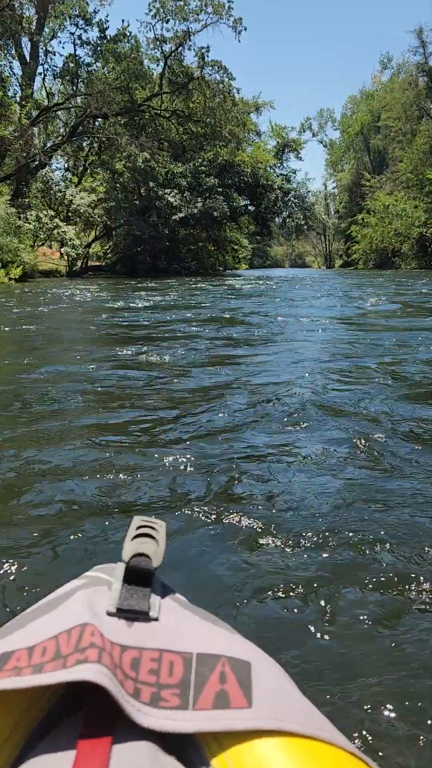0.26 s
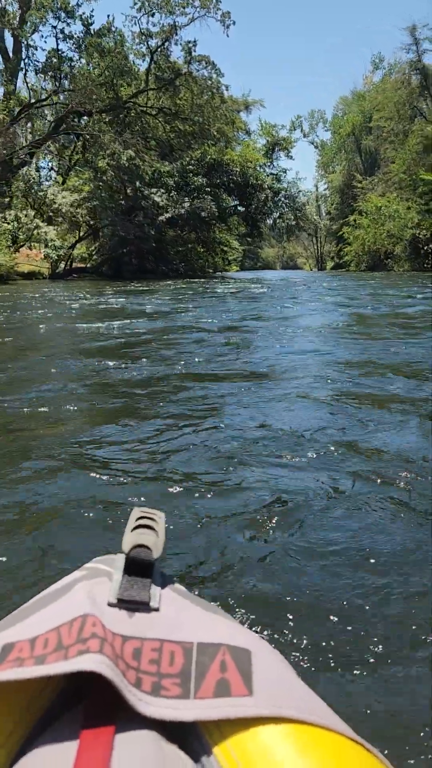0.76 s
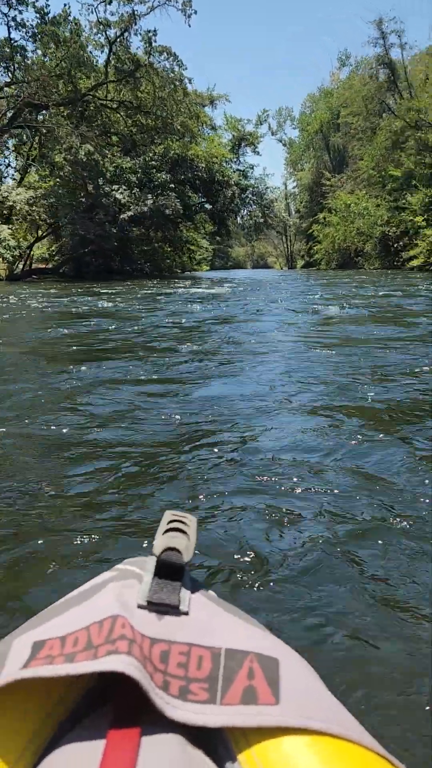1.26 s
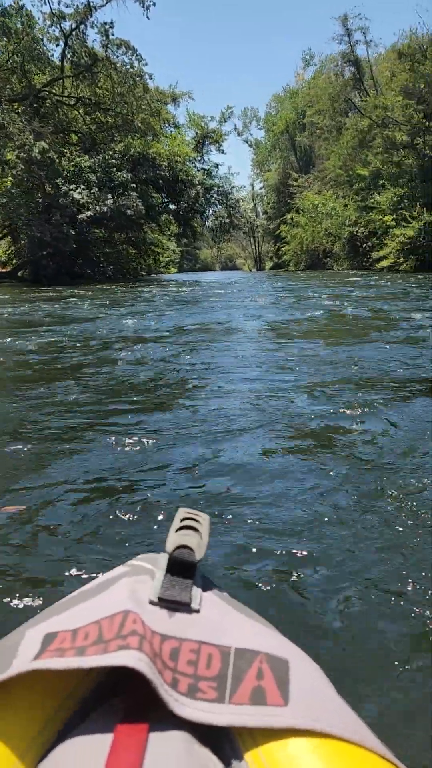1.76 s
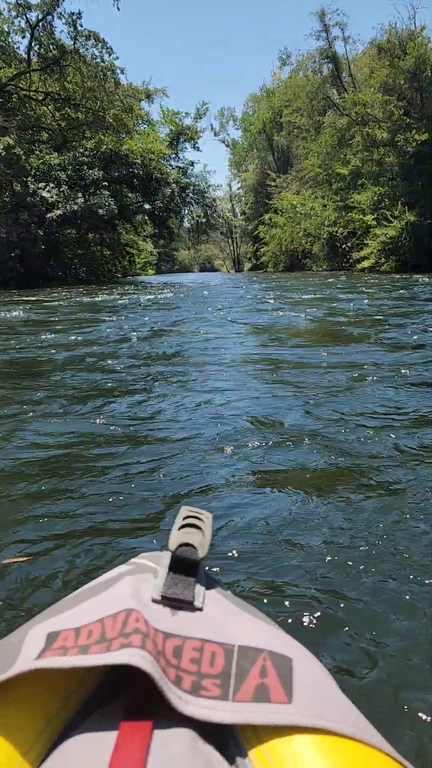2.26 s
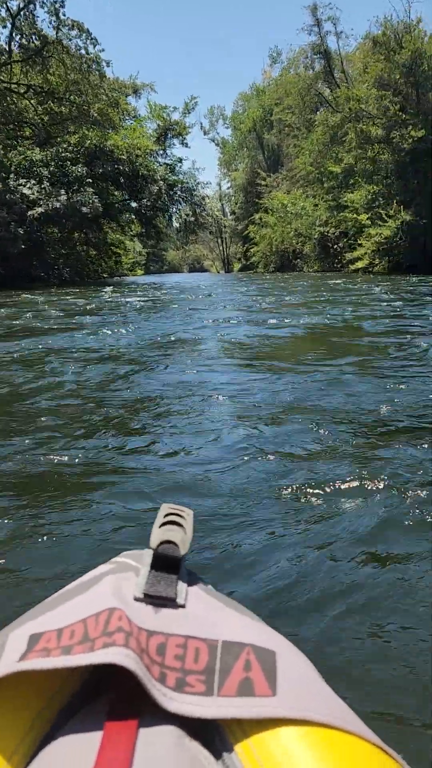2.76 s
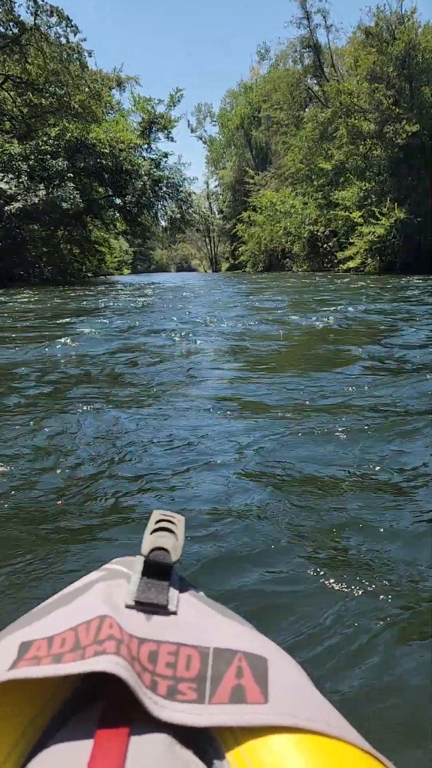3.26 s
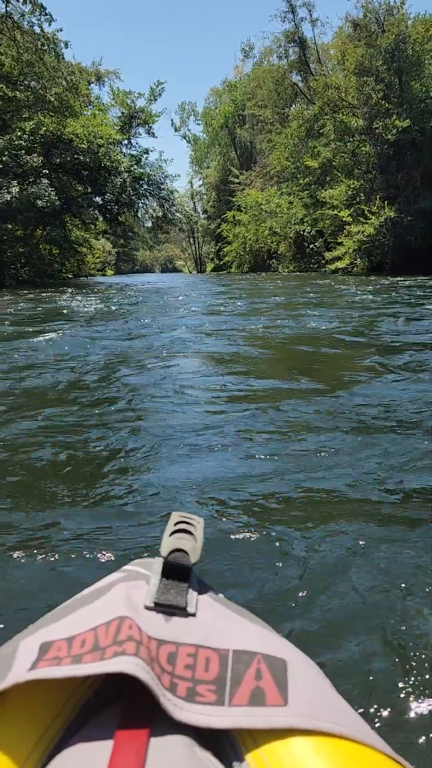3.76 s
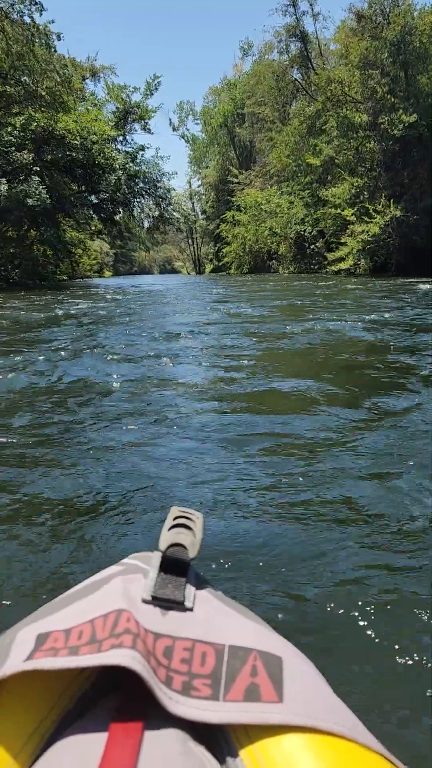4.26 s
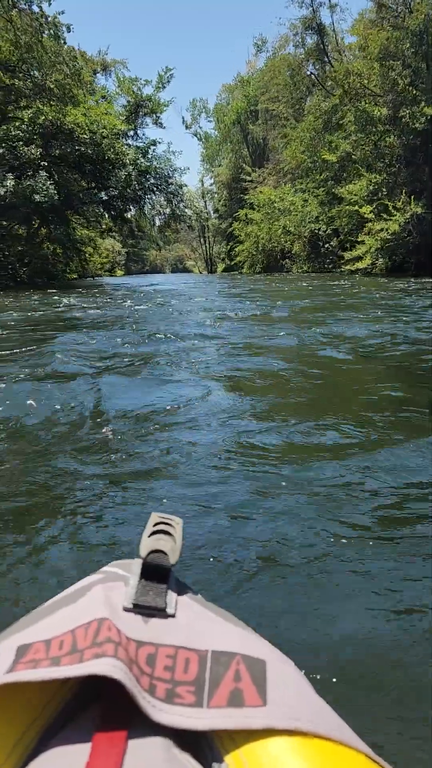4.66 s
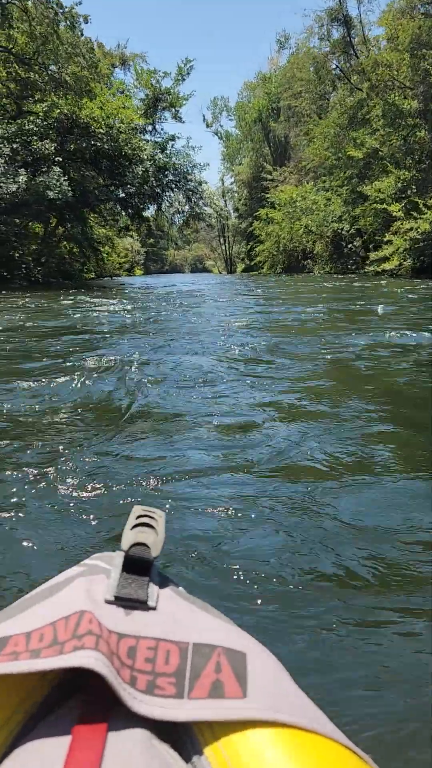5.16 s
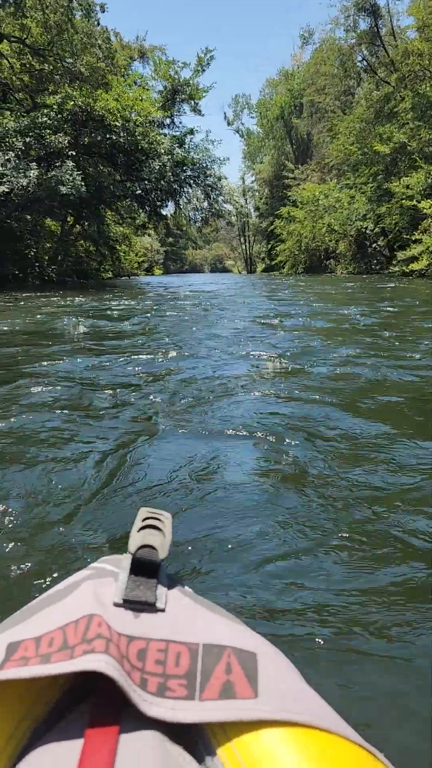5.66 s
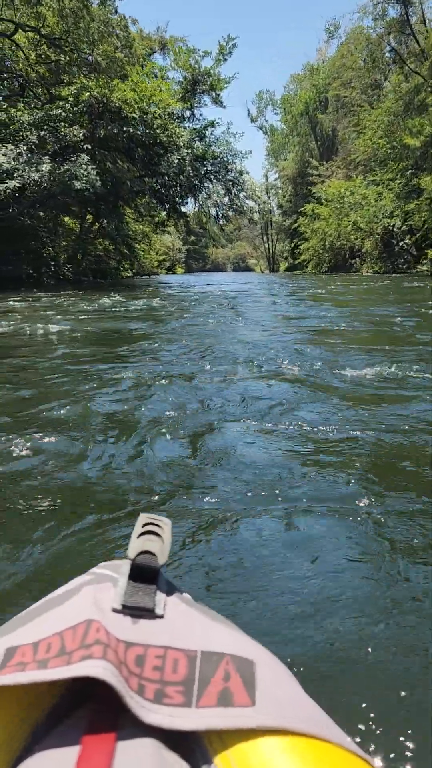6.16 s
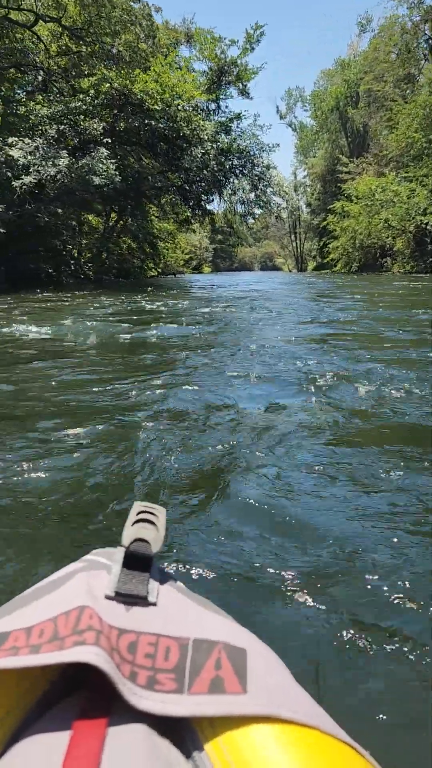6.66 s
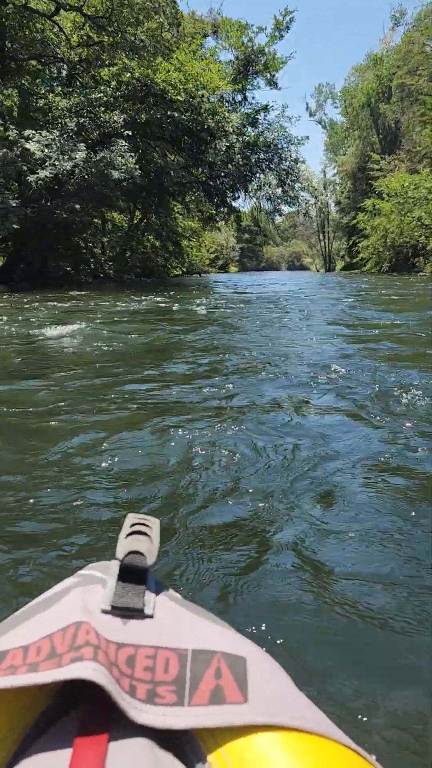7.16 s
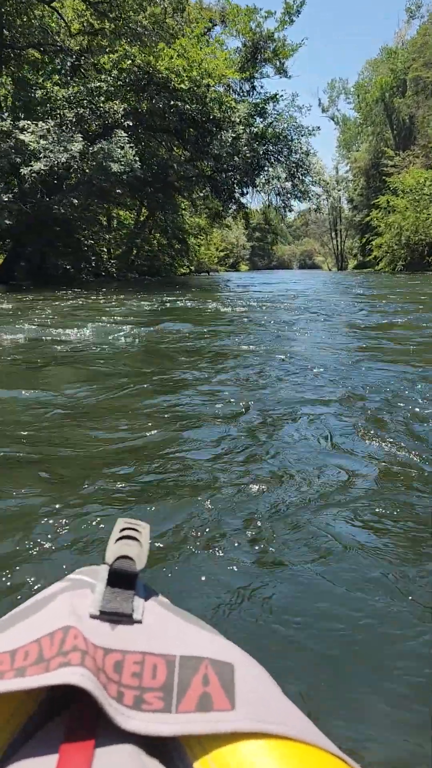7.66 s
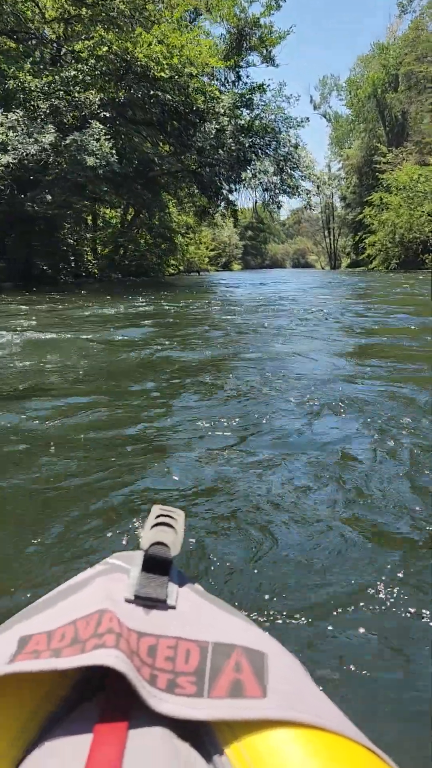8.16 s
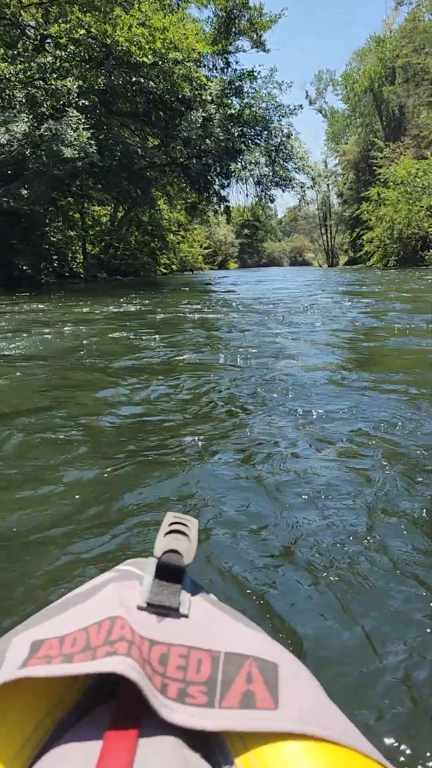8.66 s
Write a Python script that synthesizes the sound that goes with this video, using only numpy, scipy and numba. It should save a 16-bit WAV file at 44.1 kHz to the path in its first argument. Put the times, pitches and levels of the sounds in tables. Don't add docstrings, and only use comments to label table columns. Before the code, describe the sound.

A fast river hisses steadily around an inflatable boat while wavelets slap its air-filled tubes with dull booms, bubbles pop and drops patter on deck.

```python
import sys
import numpy as np
from scipy import signal
from scipy.fft import rfft, irfft, next_fast_len
from scipy.io import wavfile
from scipy.ndimage import uniform_filter1d
from numba import njit

SR = 44100
rng = np.random.default_rng(int(sys.argv[2]) if len(sys.argv) > 2 else 0)


def voltage_ratio(level):
    return 10 ** (np.asarray(level, float) / 20)


def master(y):
    cut = np.clip(np.atleast_2d(y).T, -1, 1)
    pcm = np.round(cut * 32767)
    wavfile.write(sys.argv[1], SR, pcm.astype(np.int16))


N = 393354
T = np.arange(N) / SR

# (onset [s], level [dB], treble re that level [dB])
BREAKS = [(.738, -20, -25), (1.361, -16, -21), (1.393, -13.5, -21), (1.444, -19.5, -38), (1.866, -19, -18),
          (2.011, -18, -22), (2.172, -27, -14), (2.43, -21, -22), (2.745, -19, -22), (3.763, -19, -28),
          (4.38, -17.5, -18.5), (4.435, -20, -32), (4.728, -18, -36), (4.79, -15.5, -16),
          (5.231, -19, -15.5), (4.616, -15, -15), (5.57, -17.5, -21), (6.345, -15.5, -27),
          (6.954, -20, -14), (6.986, -16, -23), (7.043, -13.5, -22), (7.294, -17, -35), (7.346, -19, -37),
          (6.412, -19, -24), (7.632, -13.5, -24), (7.663, -10.5, -28), (7.898, -19, -14.5),
          (8.187, -21, -20.5), (8.234, -20, -24.5), (8.512, -20, -30), (.938, -21, -28), (1.948, -16, -22),
          (2.345, -22, -26), (2.476, -19, -24), (5.405, -19, -20), (5.474, -22, -20), (6.427, -18, -24)]
BREAK_S = .004


def unit(x):
    return x / np.sqrt(np.mean(x ** 2))


def low(x, hz, order):
    return signal.sosfilt(signal.butter(order, hz, fs=SR, output="sos"), x)


@njit
def svf(x, hz, width):
    y, band, deep = np.empty(len(x)), 0., 0.
    g, k = np.tan(np.pi * hz / SR), width / hz
    for i in range(len(x)):
        v = (band + g * (x[i] - deep)) / (1 + g * (g + k))
        band = 2 * v - band
        deep += 2 * g * v
        y[i] = k * v
    return y


@njit
def rings(s, size, hz, tau, rise, turn, round_=1.):
    y = np.zeros(N)
    for k in range(len(s)):
        start, phase = int((s[k] - tau[k]) * SR), turn[k]
        for i in range(max(-start, 0), min(int(8 * tau[k] * SR), N - start)):
            u = i / (tau[k] * SR)
            pitch = min(hz[k] * (1 + rise[k] * (u - 1)), .45 * SR)
            phase += 2 * np.pi * pitch / SR
            y[start + i] += size[k] * (u * np.exp(1 - u)) ** round_ * np.sin(phase)
    return y


def swell(s, db, tau):
    return rings(s, voltage_ratio(db), 0 * s, tau + 0 * s, 0 * s, 0 * s + np.pi / 2)


def walk(rate):
    hold = int(SR / rate)
    steps = np.repeat(rng.standard_normal(N // hold + 1), hold)
    slewed = uniform_filter1d(uniform_filter1d(steps, hold), hold)
    return unit(slewed[:N])


def curves(table):
    s, *columns = np.transpose(table)
    return [np.interp(T, s, c) for c in columns]


def port_db(hz):
    # (frequency [Hz], level per Hz [dB])
    left_port = [(30, -44), (70, -49), (140, -54.5), (250, -72.5), (420, -72.5), (560, -65.5),
                 (1200, -68.5), (1550, -67.5), (2050, -65), (2900, -79), (4700, -78.5), (5300, -87.5),
                 (7600, -86.5), (9300, -101)]
    # (frequency [Hz], level per Hz [dB])
    right_port = [(30, -53), (70, -46), (140, -58), (230, -86), (390, -61.5), (470, -75), (800, -67),
                  (1300, -69.5), (1550, -64.5), (1950, -78.5), (2900, -89), (4600, -92.5), (5300, -93),
                  (8400, -103)]
    # (frequency [Hz], left level per Hz [dB], right level per Hz [dB])
    top_octave = [(9350, -101, -120), (10800, -96.5, -113), (11150, -120, -134), (11600, -120, -132),
                  (11900, -104, -120), (13700, -101, -119), (15000, -105, -124), (15700, -113, -130)]
    top = np.array(top_octave)
    left = np.vstack([left_port, top[:, [0, 1]]])
    right = np.vstack([right_port, top[:, [0, 2]]])
    return np.array([np.interp(np.log(hz), np.log(t[:, 0]), t[:, 1]) for t in (left, right)])


def ports(x):
    n = next_fast_len(N)
    hz = np.arange(n // 2 + 1) * SR / n + 1
    cavity_db = 3.9 / (1 + ((hz - 1555) / 70) ** 2) + 2.2 / (1 + ((hz - 2600) / 150) ** 2)
    return irfft(rfft(x, n) * voltage_ratio(port_db(hz) + cavity_db + 65.5), n)[:, :N]


def pair(hz, width):
    # (frequency [Hz], left-right correlation [-1 to 1])
    likeness = [(60, 0.85), (300, 0.77), (700, 0.75), (1500, 0.57), (3500, 0.18)]
    known_hz, alike = np.transpose(likeness)
    c = np.clip(np.interp(np.log(hz), np.log(known_hz), alike), 0, 1)
    mid, side = (svf(rng.standard_normal(N), hz, width) for _ in range(2))
    return np.sqrt(1 + c) * mid + np.sqrt(1 - c) * side * np.array([[1], [-1]])


def shower(count, lo_hz, hi_hz, cycles, rise, spread_db):
    when, pitch, loud, place = rng.random((count, 4)).T
    hz = lo_hz * (hi_hz / lo_hz) ** pitch
    size = voltage_ratio(-spread_db * np.log(1 - .98 * loud)) * hz / lo_hz
    sides = np.cos(place * np.pi / 2), np.sin(place * np.pi / 2)
    return unit(np.array([rings(when * N / SR, size * g, hz, cycles / hz, rise + 0 * hz, 0 * hz)
                          for g in sides]))


def heard(s, db, hz, tau, rise, left_share):
    left, right = port_db(hz)
    pans = (left_share * (left - right), (left_share - 1) * (left - right))
    return np.array([rings(s, voltage_ratio(db + pan), hz, tau, rise, 0 * s) for pan in pans])


def river(rush_db):
    hiss, surge = 0, walk(4.0)
    for hz in 216.0 * 2 ** np.arange(0, 6.4, .5):
        flicker_db = 0.32 * surge + 2.1 * walk(13)
        hiss = hiss + voltage_ratio(flicker_db) * pair(hz, hz / 2.1)
    fizz = shower(count=5000, lo_hz=400., hi_hz=14070.0, cycles=2.593, rise=0.017, spread_db=4.6)
    gurgle = shower(count=900, lo_hz=449.0, hi_hz=3520.0, cycles=2.527, rise=0.049, spread_db=2.5)
    return voltage_ratio(rush_db + 9.0) * ports(unit(hiss) + voltage_ratio(-7.5) * fizz + voltage_ratio(-11.5) * gurgle)


def heave(heave_db, lap_db):
    heave_gain = voltage_ratio(heave_db - 3.0 + 2.4 * np.clip(walk(12), -2, 1.2))
    lap_gain = voltage_ratio(lap_db - 3.0 + 3.6 * np.clip(walk(22), -2, 1.1))
    flex = unit(pair(56.0, 12.0) + voltage_ratio(-8.5) * pair(23.0, 22.0))
    lapping = unit(pair(85., 30.0) + voltage_ratio(2.5) * low(pair(140.6, 32.0), 175., order=2))
    return heave_gain * flex + lap_gain * lapping


def booms():
    # (peak [s], boom [dB], boom pitch [Hz], length [s], thump re boom [dB])
    slaps = [(1.316, -15.5, 106, .014, -18), (1.401, -12, 141, 0.015, -8.5), (1.435, -14, 125, 0.024, -10),
             (1.763, -19.5, 123, 0.019, -14), (1.884, -13.5, 96, 0.029, -11), (1.965, -2, 115, 0.013, -16),
             (2.496, -15, 150, 0.018, -8), (3.779, -15, 147, 0.024, -19), (4.428, -21, 160, 0.024, 4.5),
             (4.46, -14, 138, 0.017, -23), (4.641, -16.5, 147, 0.02, -13), (4.806, -10.5, 129, 0.029, -19),
             (5.256, -18, 135, 0.014, -21), (5.426, -14, 149, 0.02, -17), (5.591, -17, 165, 0.015, -4),
             (6.387, -16, 117, 0.014, -11), (6.434, -12.5, 140, 0.013, -9), (6.962, -11, 126, 0.031, -11.5),
             (6.994, -10, 133, .02, -12), (7.017, -8.5, 114, .017, -22), (7.061, -4.5, 144, 0.019, -25),
             (7.683, -11, 131, .014, -13.5), (8.765, -13, 127, 0.012, -19), (8.798, -12, 138, 0.02, -29)]
    # (peak [s], boom [dB], boom pitch [Hz])
    taps = [(.752, -25, 107), (.782, -25.5, 137), (1.251, -26, 138), (2.033, -19.5, 145), (2.196, -23, 159),
            (2.372, -19, 114), (2.909, -28, 96), (3.207, -27.5, 114), (3.291, -27, 129), (3.75, -25, 120),
            (3.894, -24.5, 148), (4.091, -25.5, 127), (4.277, -27, 83), (4.385, -18, 161),
            (4.689, -22, 130), (4.748, -20, 135), (4.856, -26, 108), (5.089, -22.5, 104), (5.23, -25, 162),
            (5.318, -32, 87.5), (5.502, -19, 112), (5.826, -29, 102), (6.074, -27, 82),
            (7.343, -27.5, 90.5), (7.629, -27, 97), (7.74, -18.5, 130), (8.169, -22, 154),
            (8.525, -22, 102), (8.832, -23, 130), (.024, -27, 122), (.25, -30, 115), (.47, -30, 148),
            (.89, -28, 120), (1.276, -27, 125), (1.387, -18, 138), (1.467, -20, 130), (1.79, -23, 114),
            (1.953, -12, 111), (1.992, -14, 93), (2.402, -26, 126), (2.521, -18, 137), (3.165, -30, 138),
            (3.37, -31, 120), (4.228, -27, 127), (4.706, -24, 122), (4.782, -22, 119), (4.833, -20, 105),
            (5.056, -29, 113), (5.3, -28, 125), (5.481, -23, 150), (5.527, -23, 121), (5.627, -28, 125),
            (6.348, -25, 135), (6.45, -16, 127), (6.468, -18, 117), (6.689, -28, 120), (6.714, -30, 113),
            (6.76, -31, 100), (7.044, -15, 130), (7.758, -22, 137)]
    tap_cycles, tap_thump_db = 2.3, -13
    full_taps = [(s, db, hz, tap_cycles / hz, tap_thump_db) for s, db, hz in taps]
    s, db, hz, length, thump_db = np.transpose(slaps + full_taps)
    steady_s, sag_per_s = 0.018, 13.2
    rise = -sag_per_s * np.maximum(length - steady_s, 0)
    turn, place = rng.random((len(s), 2)).T
    pan_db = 0.075 * (hz - 90) + 3.9 * (place - .5)
    sides = voltage_ratio(np.array([pan_db, -pan_db]) / 2)
    boom = [rings(s, voltage_ratio(db) * g, hz, 0.6 * length, rise, 2 * np.pi * turn + lag * place, 2.)
            for g, lag in zip(sides, (0., 1.6))]
    thump = unit(pair(343.0, 100.0) + voltage_ratio(1.5) * pair(168.0, 60.)) * voltage_ratio(np.array([[-2.5], [1.5]]))
    return np.array(boom) + voltage_ratio(-5.0) * swell(s - .008, db + thump_db, 0.6 * length) * thump


def rocking():
    # (peak [s], level [dB], pitch [Hz])
    rocks = [(1.344, -27, 65), (1.408, -23, 57), (1.446, -16, 54), (1.901, -17, 65), (1.98, -13, 68),
             (2.02, -24, 63), (2.531, -29, 61), (3.2, -32, 60), (3.795, -29, 63), (4.07, -29, 50),
             (4.283, -31, 58), (4.44, -24, 59), (4.482, -22, 61), (4.521, -27, 55), (4.751, -28, 54),
             (4.831, -19, 58), (5.266, -23, 61), (5.333, -28, 58), (5.453, -28, 62), (6.393, -26, 63),
             (6.455, -20, 65), (6.983, -23, 53), (7.022, -18, 66), (7.077, -19, 64), (7.109, -25, 76),
             (7.666, -26, 63), (7.709, -26, 63), (8.819, -27, 67), (8.853, -27, 61)]
    s, db, hz = np.transpose(rocks)
    return rings(s, voltage_ratio(db), hz, .85 / hz, 0 * s, 2 * np.pi * rng.random(len(s)), 1.5)


def hull(heave_db, lap_db):
    return low(heave(heave_db, lap_db) + booms() + rocking(), 665.0, order=4)


def froth():
    s, db = np.repeat(BREAKS, 4, axis=0).T[:2]
    late, pitch, loud = rng.random((len(s), 3)).T
    spread_s, lo_hz, hi_hz = .05, 693, 3500
    hz = lo_hz * (hi_hz / lo_hz) ** pitch
    return np.array([s - spread_s * np.log(1 - late), db - 23.5 - 7.3 * loud - 7.0 * pitch, hz])


def bubbles():
    # (peak [s], level [dB], pitch [Hz])
    close = [(.942, -23.5, 1510), (1.397, -24, 870), (1.404, -20.5, 349), (1.406, -26, 1440),
             (1.461, -23.5, 423), (1.87, -34, 1820), (1.951, -27, 344), (1.958, -20, 1690),
             (2.014, -31, 643), (4.337, -28, 1720), (4.384, -29, 1280), (4.41, -27, 533),
             (4.441, -31, 1700), (4.631, -23.5, 400), (4.743, -27.5, 336), (5, -37.5, 2110),
             (5.284, -29, 358), (5.41, -28, 345), (6.959, -22, 400), (6.994, -29, 566), (7.008, -25, 944),
             (7.044, -30, 1160), (7.059, -28.5, 2020), (7.637, -23, 1560), (7.666, -17.5, 400),
             (7.689, -24.5, 1060), (7.73, -27.5, 800), (7.775, -28, 865), (7.862, -28, 800),
             (8.794, -26, 400),
             (.84, -28, 1560), (1.02, -33, 600), (7.293, -40, 3400), (1.885, -30, 460), (2.477, -33, 480),
               (3.535, -43, 2640), (4.045, -45, 3150), (4.729, -31, 620), (5.08, -31, 380),
               (7.137, -34, 1850), (7.197, -30, 1260), (7.215, -35, 2050), (7.249, -30, 1490),
               (7.3, -28, 1530), (7.316, -44, 3000), (7.35, -28, 1490), (7.513, -41, 2580),
               (7.565, -29, 1660), (8.045, -30, 458), (8.101, -31, 1040), (8.166, -31, 1030),
               (8.19, -28, 1620), (8.239, -29, 1630), (8.283, -34, 972), (8.315, -32, 1520),
             (.113, -30, 692), (.741, -27, 388), (.745, -30, 950), (.985, -29, 533), (1.021, -30, 810),
               (1.364, -29, 1000), (1.45, -31, 1050), (2.016, -26, 300), (2.18, -31, 1700),
               (2.233, -29, 371), (2.326, -30, 390), (2.352, -30, 600), (2.44, -28, 883), (2.462, -28, 780),
               (2.482, -22, 334), (2.602, -28, 1000), (2.75, -33, 400), (3.225, -31, 930),
               (4.438, -27, 450), (4.59, -30, 775), (4.794, -29, 340), (5.31, -32, 1270), (5.478, -28, 353),
               (6.35, -31, 541), (6.357, -30, 1350), (6.433, -26, 334), (6.52, -32, 640), (6.607, -31, 980),
               (6.72, -35, 760), (6.945, -27, 330), (6.995, -27, 1220), (7.02, -27, 1580),
               (7.671, -22, 560), (7.79, -29, 900), (7.91, -30, 720), (8.715, -33, 264)]
    # (peak [s], level [dB], pitch [Hz], length [s], pitch rise [share])
    closing = [
        (6.21, -34, 600, .022, 0.069),
        (6.255, -34, 850, .022, .5),
        (1.742, -33, 500, .024, .3),
        (1.768, -32, 690, .014, .3),
        (2.14, -33, 1150, .014, .3),
    ]
    s, db, hz = np.hstack([np.transpose(close), froth()])
    near = heard(s, db + 1.5, hz, 0.00209 + 1.035 / hz, 0 * s + 0.031, left_share=0.81)
    s, db, hz, length, rise = np.transpose(closing)
    gulps = heard(s, db, hz, length / 2, rise / 2, left_share=0.8)
    near_gain = voltage_ratio(3.2 * walk(300) - 1.0)
    gulp_gain = voltage_ratio(2.7 * np.tanh(walk(90)))
    return low(near * near_gain + gulps * gulp_gain, 3800., order=4)


def drops():
    # (time [s], level [dB], pitch [Hz])
    falling = [(.364, -32, 7300), (.997, -26, 5560), (1.374, -31, 6370), (1.869, -25, 4400),
               (1.951, -24, 4900), (2.015, -26, 4960), (2.099, -25, 3300), (2.145, -24.5, 3870),
               (2.434, -26, 3620), (3.585, -28, 4760), (4.113, -18, 4320), (4.304, -20.5, 6340),
               (4.395, -27, 6200), (.788, -30, 4000), (4.618, -27, 3030), (4.795, -30, 5900),
               (6.375, -26, 4160), (6.421, -18, 4240), (6.617, -27, 5370), (6.655, -26, 4870),
               (6.678, -23.5, 4310), (6.709, -18, 4440), (6.944, -25, 4370), (7.065, -20, 2880),
               (7.245, -23.5, 4200), (7.809, -25, 4370), (7.895, -25, 6370), (7.911, -21, 4480),
               (7.932, -24.5, 4480), (7.987, -17, 4580),
               (.128, -35, 4260), (.249, -35, 3340), (.592, -35, 3490), (1.078, -32, 3770),
                (2.071, -34, 4170), (2.179, -32, 4250), (2.229, -32, 4220), (2.273, -34, 4280),
                (2.357, -32, 3300), (2.385, -35, 3820), (2.749, -35, 3940), (3.315, -38, 3930),
                (3.572, -33, 4800), (3.962, -38, 4410), (4.027, -32, 3190), (4.185, -32, 4320),
                (4.941, -35, 4170), (5.017, -30, 4240), (5.076, -34, 4330), (5.125, -32, 4230),
                (5.24, -30, 4700), (5.325, -38, 3980), (5.415, -35, 6500), (5.477, -36, 6800),
                (5.51, -36, 3220), (5.556, -32, 4930), (5.711, -39, 4210), (5.762, -39, 3420),
                (5.808, -35, 4600), (5.896, -35, 4530), (5.932, -35, 4780), (6.026, -40, 7100),
                (6.591, -30, 4330), (6.868, -35, 4450), (7.125, -34, 4700), (7.165, -33, 3400),
                (7.179, -28, 2710), (7.21, -37, 7800), (7.217, -30, 4290), (7.275, -36, 6300),
                (7.352, -32, 3370), (7.372, -35, 6000), (7.446, -38, 4290), (7.504, -32, 4160),
                (7.615, -33, 4570), (7.728, -33, 4700), (7.877, -28, 4310), (8.014, -36, 4030),
                (8.032, -33, 6500), (8.052, -35, 3220), (8.106, -34, 7700), (8.154, -36, 3210),
                (8.192, -33, 3440), (8.25, -36, 5800), (8.462, -39, 4260), (8.582, -38, 7300),
                (8.657, -39, 7600), (8.692, -34, 4990), (8.716, -38, 7200), (8.826, -34, 3060)]
    # (time [s], level [dB])
    ticks = [(.365, -41), (1.375, -52), (2.103, -49), (2.467, -46), (4.113, -28), (4.395, -50),
             (4.743, -43), (6.642, -42), (6.666, -43), (6.72, -44), (6.765, -42), (5.812, -48), (7.18, -44),
             (7.896, -45), (8.108, -48), (8.157, -49)]
    s, db, hz = np.transpose(falling)
    ping = heard(s, db + 0.5, hz, 0 * s + .001, 0 * s, left_share=0)
    hiss = swell(s, db - 18, 0.0028) * unit(ports(np.diff(pair(4560.0, 3100.0), prepend=0)))
    s, db = np.transpose(ticks)
    click = unit(np.diff(svf(rng.standard_normal(N + 1), 7600.0, 10000.0)))
    tick = swell(s, db + 3.5, 0.0005) * click
    return ping + hiss + tick * voltage_ratio(np.array([[0], [-14]]))


def crests():
    # (peak [s], slosh [dB], spray [dB], time to fade by 20 dB [s])
    waves = [(.85, -30, -46, 0.5), (1.4, -29, -46, 0.3), (1.96, -20, -39.5, 0.13), (2.1, -37, -44, 1),
             (3.95, -40, -51, .6), (4.42, -23.5, -40, 0.23), (4.65, -31, -41.5, 1), (6.425, -35, -39, 0.15),
             (6.6, -38, -40.5, 0.3), (6.69, -38, -39, 0.2), (6.755, -38, -39, .05),
             (6.999, -24, -36.5, 0.25), (7.2, -43, -46, 0.6), (7.67, -29, -42, 0.78),
             (7.92, -39, -43, 0.08)]
    s, slosh_db, spray_db, fade_s = np.array(waves).T[:, :, None]
    shape_db = np.where(T < s, 170 * (T - s), -20 * (T - s) / fade_s)

    def over_calm(db, calm_db):
        return 10 * np.log10(np.sum(voltage_ratio(db + shape_db) ** 2, axis=0) + voltage_ratio(calm_db) ** 2)

    return over_calm(slosh_db, -40), over_calm(spray_db, -58.5)


def slosh(slosh_db):
    gurgle = shower(count=2500, lo_hz=302.0, hi_hz=2800.0, cycles=1.512, rise=0.045, spread_db=1.5)
    water = unit(pair(880.0, 1900.0)) + voltage_ratio(-1.5) * gurgle
    water = unit(low(ports(water - low(water, 190.0, order=1)), 2940.0, order=2))
    return voltage_ratio(slosh_db - 6.0 + 2.7 * np.clip(walk(70), -2, 2)) * water


def breakers():
    s, db, _ = np.transpose(BREAKS)
    crack_s, crack_db = .0008, 1.5
    burst = swell(s + BREAK_S, db - 14.0, BREAK_S) + swell(s + crack_s, db - 14.0 + crack_db, crack_s)
    return burst * unit(low(ports(pair(1100., 3000.)), 3300., order=2))


def spray(spray_db):
    # (pitch [Hz], width [Hz], level [dB])
    deck = [
        (3480, 200, -1.5),
        (4400, 330, 6),
        (6270, 1800, 0.5),
    ]
    s, db, treble_db = np.transpose(BREAKS)
    ticks = shower(count=9000, lo_hz=2545.0, hi_hz=17250.0, cycles=0.87, rise=0., spread_db=3.0)
    ticks = ticks + voltage_ratio(-1.0) * rng.standard_normal((2, N))
    ring = sum(voltage_ratio(ring_db) * np.array([svf(c, 1. * hz, 1. * width) for c in ticks])
               for hz, width, ring_db in deck)
    patter = unit(ports(ring + voltage_ratio(7.5) * (ticks - low(ticks, 3900.0, order=1))))
    clumps = voltage_ratio(spray_db + 1.5 + 4.2 * np.clip(walk(60), -1.5, 1.2))
    thrown = swell(s + BREAK_S, db + treble_db - 2.5, 1.6 * BREAK_S)
    plops = shower(count=1100, lo_hz=1900., hi_hz=8100.0, cycles=2.484, rise=0.042, spread_db=3.0)
    return (clumps + thrown) * patter + voltage_ratio(spray_db - 5.0) * unit(ports(plops))


def scene():
    # (time [s], hull heave [dB], hull lapping [dB], river rush [dB])
    flow = [
        (0.0, -44, -43, -34),
        (2.06, -32, -43.5, -37),
        (2.36, -39, -32.5, -35),
        (3.5, -44.5, -47.5, -36.5),
        (4.55, -35, -31.5, -36.5),
        (6.14, -42.5, -42.5, -39.5),
        (7.13, -31.5, -50, -39),
        (7.23, -35.5, -46, -37.5),
        (8.92, -36.5, -36.5, -39),
    ]
    heave_db, lap_db, rush_db = curves(flow)
    slosh_db, spray_db = crests()
    near = hull(heave_db, lap_db) + bubbles() + drops()
    return river(rush_db) + near + slosh(slosh_db) + breakers() + spray(spray_db)


def roll_off(x):
    return signal.sosfilt(signal.butter(12, 15830, fs=SR, output="sos"), x)


def record(dry):
    port_lag, top_hz = 4, 15800
    late = np.array([dry[0], np.roll(dry[1], port_lag)])
    rounded = np.tanh(1.1 * late) / 1.1
    cut = signal.sosfilt(signal.ellip(8, .2, 60, top_hz, fs=SR, output="sos"), rounded)
    return roll_off(cut)


dry = scene()
out = record(dry)
master(out)
```